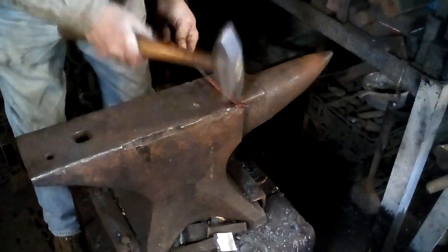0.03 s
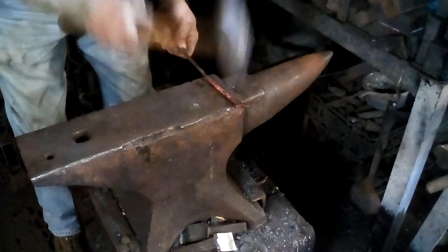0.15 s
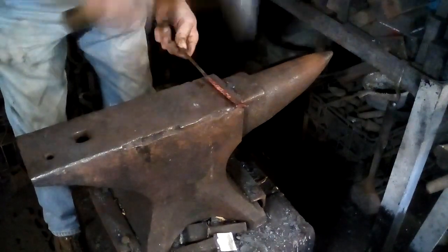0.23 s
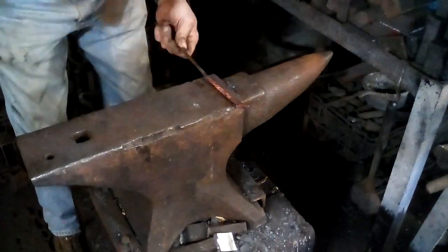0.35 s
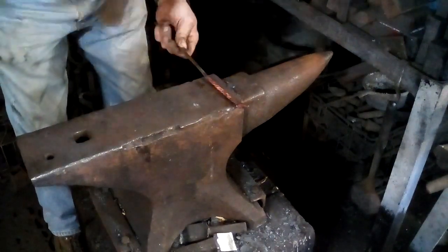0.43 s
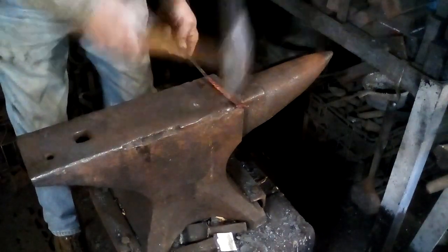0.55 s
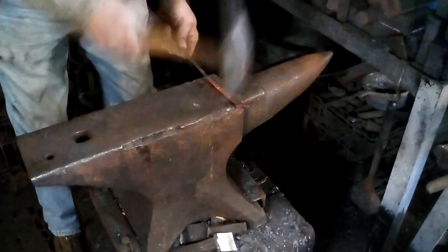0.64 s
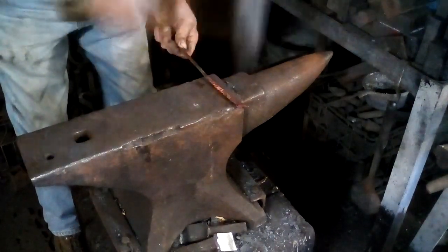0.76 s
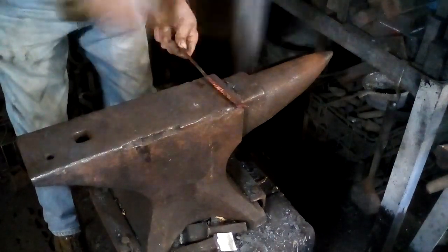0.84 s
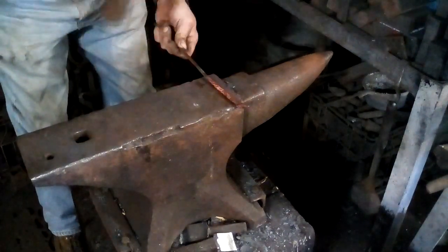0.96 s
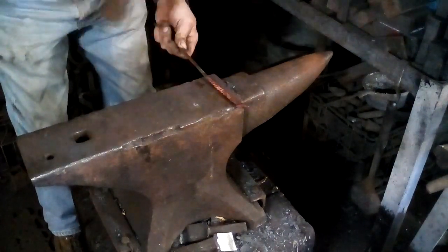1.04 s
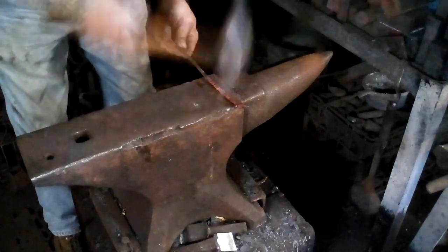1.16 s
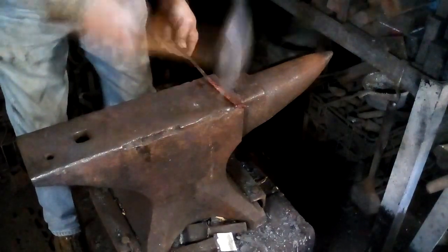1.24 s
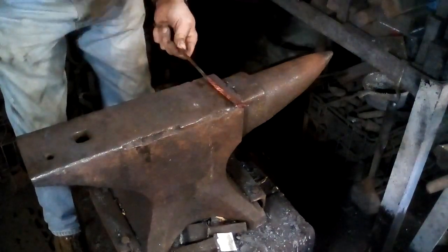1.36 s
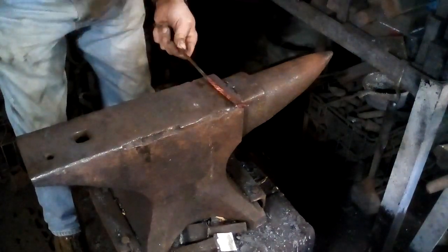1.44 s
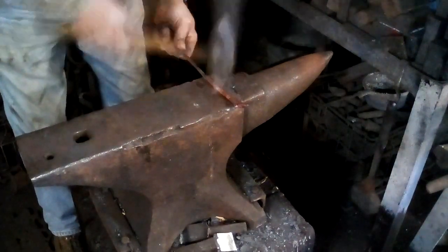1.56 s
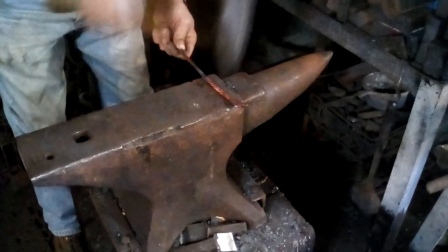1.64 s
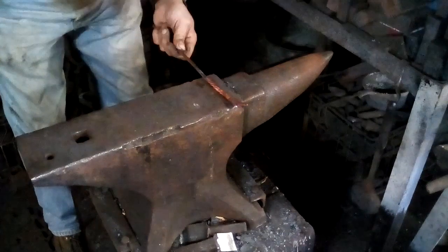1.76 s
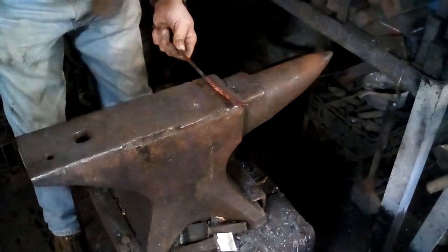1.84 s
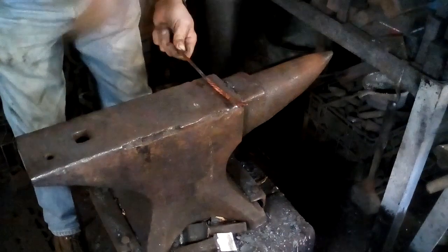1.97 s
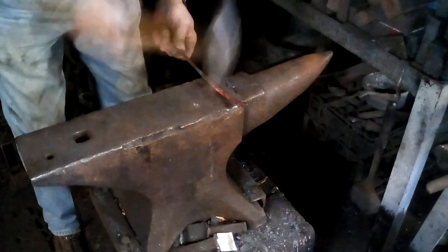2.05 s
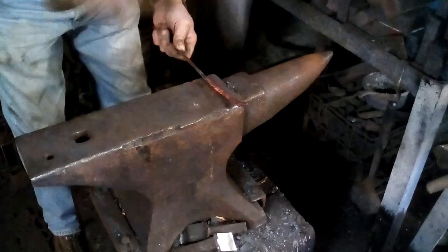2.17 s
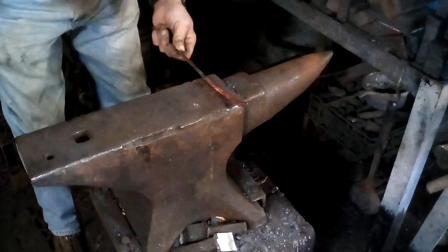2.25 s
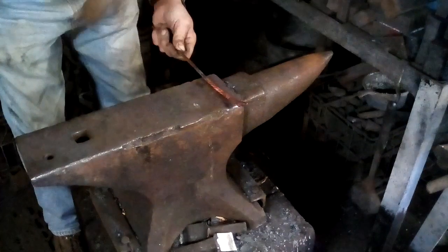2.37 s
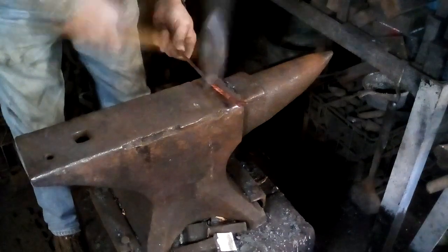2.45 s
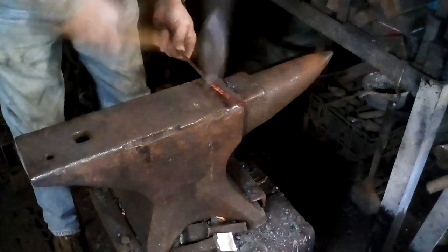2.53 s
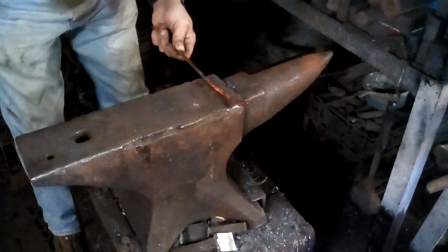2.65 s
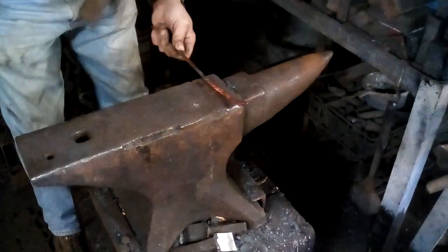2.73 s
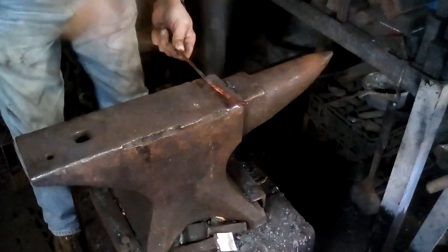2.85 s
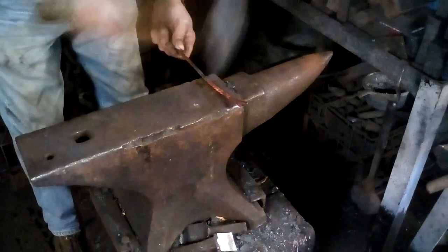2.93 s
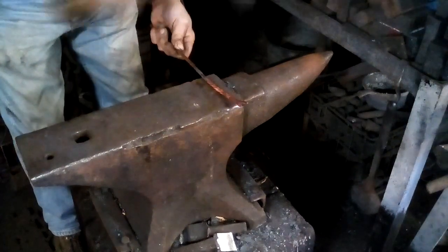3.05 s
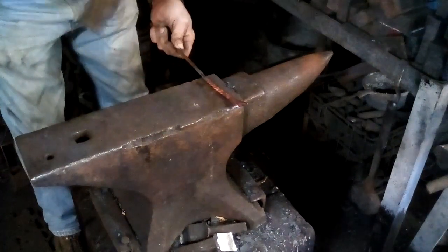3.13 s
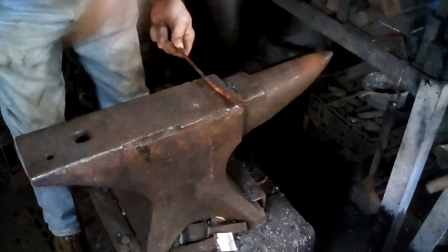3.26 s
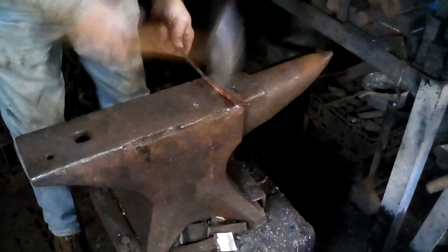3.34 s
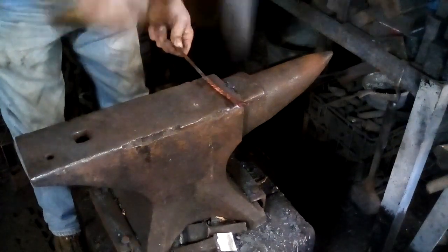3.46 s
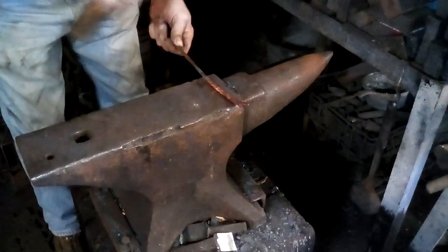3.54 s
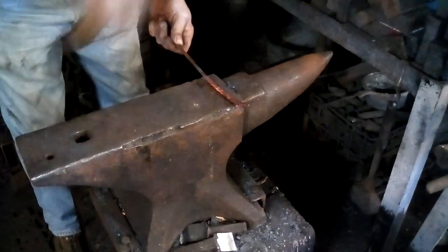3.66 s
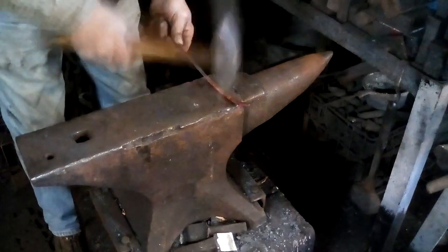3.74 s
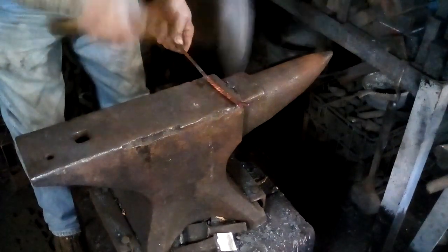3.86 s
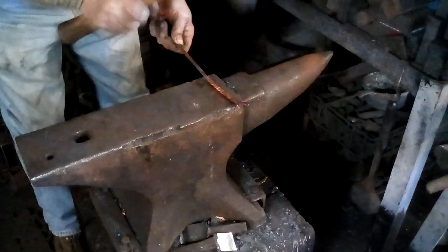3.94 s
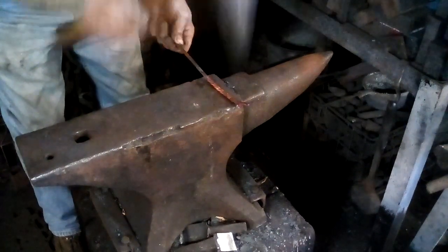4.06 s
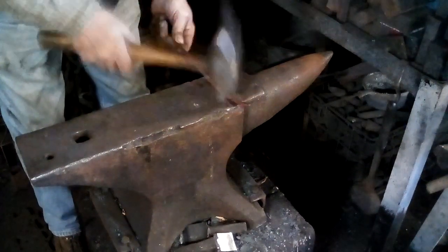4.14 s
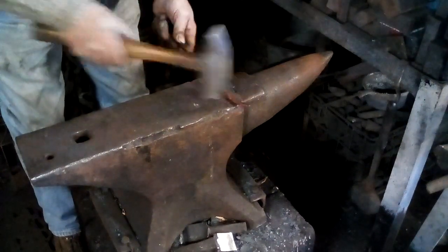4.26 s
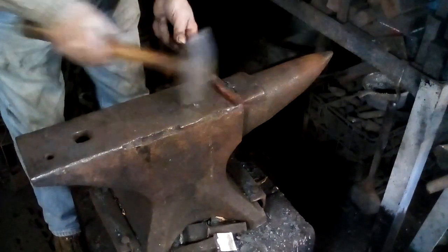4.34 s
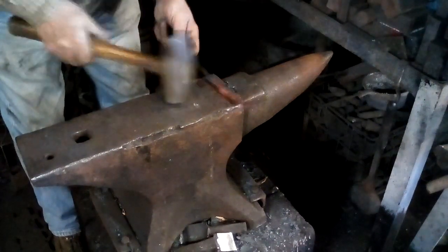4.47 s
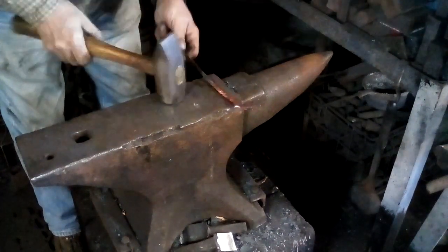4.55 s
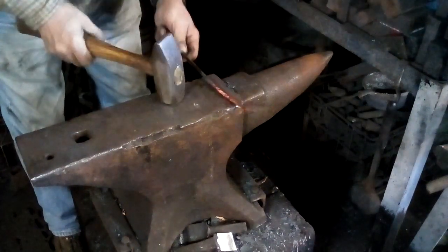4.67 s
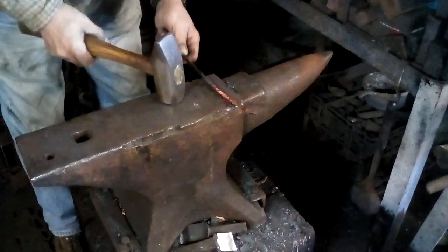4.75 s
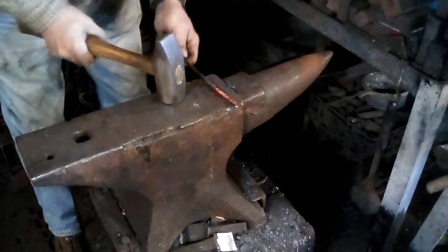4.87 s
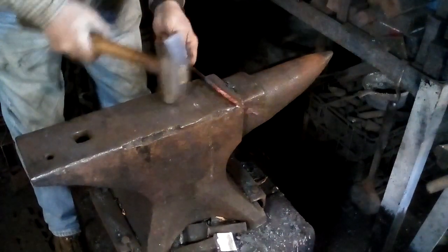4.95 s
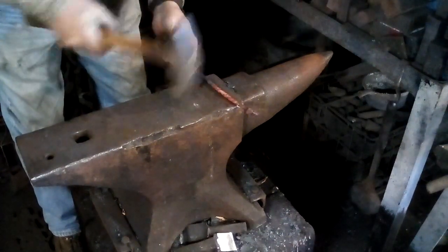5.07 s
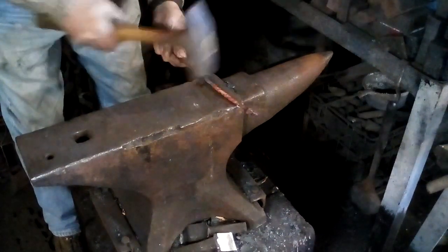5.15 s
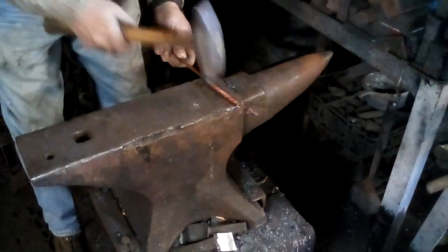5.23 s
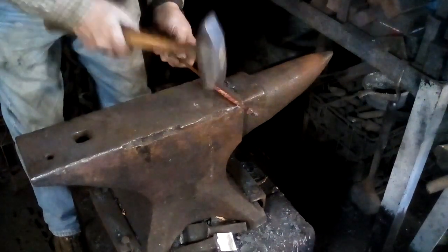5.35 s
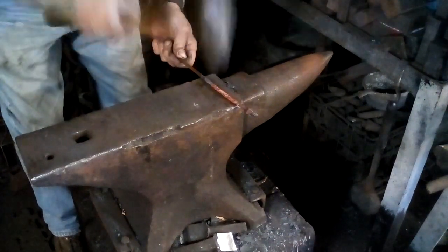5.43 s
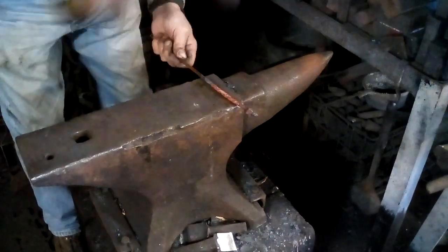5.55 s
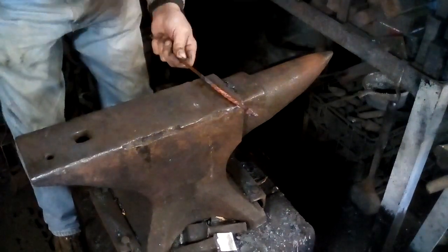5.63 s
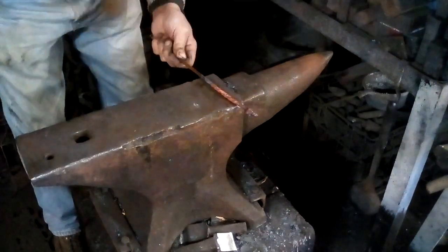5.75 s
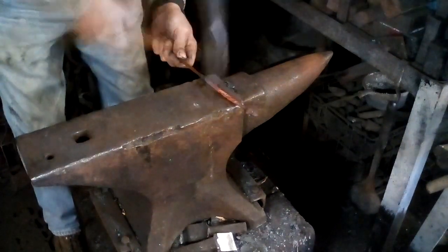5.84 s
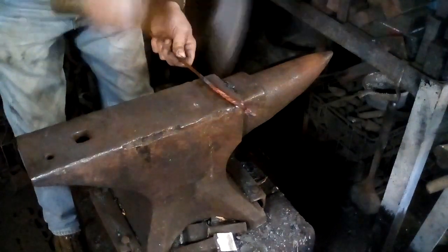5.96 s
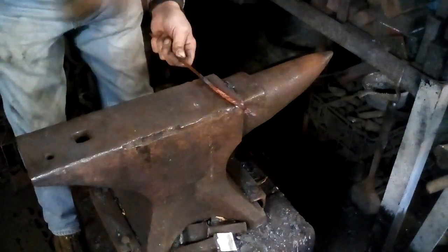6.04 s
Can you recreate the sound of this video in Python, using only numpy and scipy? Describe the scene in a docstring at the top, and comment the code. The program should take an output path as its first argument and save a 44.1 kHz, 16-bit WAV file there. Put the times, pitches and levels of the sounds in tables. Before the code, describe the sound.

Heavy hammer blows clang on hot steel over an anvil, break into small bouncing taps and a pause, then land once more.

```python
"""A smith draws out a hot steel bar on an anvil, over low shop rumble. One light blow, then nine heavy
ones (0.7-4.2 s): each a crack, ringing steel and a wash of workshop echo. The hammer bounces to rest
on the bare face in three taps (4.4-4.6 s). A faint blow follows, then a last heavy one (5.9 s).
Gain control ducks on each loud crack and lets the echo swell up behind it."""
import sys
import numpy as np
from scipy import signal
from scipy.fft import rfft, irfft, next_fast_len
from scipy.io import wavfile
from scipy.ndimage import uniform_filter1d, minimum_filter1d

SR = 44100
rng = np.random.default_rng(int(sys.argv[2]) if len(sys.argv) > 2 else 0)


def wrap_up_sound(samples):
    """Save the sound to the file named by the first command line argument, as 16-bit audio."""
    columns = np.atleast_2d(samples).T
    # keep every value between -1 and 1, then stretch to whole-number steps
    tamed = np.clip(columns, -1, 1)
    steps = np.round(tamed * 32767).astype(np.int16)
    wavfile.write(sys.argv[1], SR, steps)


N = 269010
TAIL = SR  # samples per struck sound
TAIL_S = np.arange(TAIL) / SR

# rumble and hiss: f/Hz, level/dB
FLOOR_EQ = [(30, -20.5), (60, 3), (150, 13.5), (400, 3), (900, -6), (2000, -11.5), (4000, -10.5),
            (6300, -14.5), (8300, -32), (14000, -29.5)]
# workshop echo: f/Hz, level/dB
ECHO_EQ = [(30, -3), (55, -16.5), (76, -11.5), (100, -5.5), (600, -1), (1250, -7), (2000, -2.5),
           (2400, -6.5), (2800, -16), (4050, -10.5), (4500, -17.5), (7400, -24.5), (8700, -40),
           (14000, -36.5)]
# echo decay: f/Hz, t60/s
ECHO_DECAY = [(80, 0.73), (210, 0.61), (560, 0.58), (1500, 0.54), (3900, 0.48), (7000, 0.34), (11000, 0.21),
              (15000, 0.13)]
# stand and low shop resonances: f/Hz, level/dB, t60/s
STAND_MODES = [(103, -6, .6), (116, -6, .6), (166, -2, .55), (177, -3, .55), (248, -6, .65), (266, -6, .55),
               (361, 0, .55), (473, -4, .55), (544, -4, .55), (562, -4, .55), (593, -1, .55),
               (636, -4, .55), (673, -6, .5), (794, -3, .55), (876, -3, .55), (909, -2, .55)]
# whole anvil jolting on its stand: f/Hz, level/dB, t60/s
THUMP_MODES = [(106, -19.5, 0.27), (125.3, -8, 0.22), (167.4, 1, 0.1), (197, -11, 0.059), (306, -7, 0.066),
               (378, -14, 0.14)]
# anvil, hammer and bar: f/Hz, level/dB, t60/s
STEEL_MODES = [(1254, -3, .55), (1492, -5, .5), (1603, -4, .5), (1707, -7, .5), (1855, 0, .52),
               (1981, -3, .45), (2240, -1, .45), (2270, -1, .42), (2345, -4, .4), (2425, -4, .4),
               (2713, -11, .4), (3575, -5, .5), (4005, -3, .5), (4064, -7, .38), (5830, -21, .35),
               (6255, -13, .33), (7294, -25, .3), (9930, -27, .28), (10990, -29, .24), (12390, -29, .2)]
# hammer head rebounding freely: f/Hz, level/dB, t60/s
HEAD_MODES = [(1020, -24, 0.031), (1900, -1.5, 0.069), (2270, 7, 0.038), (3970, 9, 0.018),
              (9900, -34, 0.17), (10900, -29.5, 0.055)]
# head and face damped against the bar: f/Hz, level/dB, t60/s
CLANK_MODES = [(1546, -0.5, 0.025), (1864, -9.5, 0.11), (2216, 3, 0.023), (3614, -16, 0.031),
               (4014, -8.5, 0.033), (6100, -18.5, 0.016)]
# cluster of close modes: f/Hz, level/dB
ZING_EQ = [(5600, -50), (6100, -14), (6250, 0), (6420, -12), (7000, -50)]
# brittle scale breaking: f/Hz, level/dB
SNAP_EQ = [(3000, -29.5), (5500, 7), (7500, -9.5), (9000, -10.5), (12000, -9.5), (15000, -11)]
# contact crack: f/Hz, level/dB
CRACK_EQ = [(35, -13), (60, -46.5), (170, 2), (420, -1.5), (600, -7.5), (1000, -0.5), (1500, -4.5),
            (2250, 1.5), (2700, -9), (3900, -4.5), (4800, -16), (7000, -16), (8500, -39), (14000, -47)]
# steel-on-steel tap, bright clink near 3 kHz over a low knock: f/Hz, gain/dB
TAP_EQ = [(120, 5), (250, 2), (650, 0), (1100, 3), (2200, 2), (3000, 11), (4000, 1), (5800, 6), (8000, -12),
          (11000, -9.5), (15000, -40)]
# full blow: f/Hz, gain/dB
BLOW_EQ = [(160, -2.5), (600, -4), (1900, -7.5), (3800, -6), (7000, -5), (11000, 0.5)]
# clang grows fastest with force: f/Hz, slope/(dB per dB of force)
FORCE_SLOPE = [(160, 0.96), (600, 0.99), (1900, 1.04), (3200, 0.97), (7000, .5), (11000, 0.5)]
# harder, shorter contact lifts the treble: f/Hz, slope/(dB per dB of hardness)
HARDNESS_SLOPE = [(700, 0), (2000, 0.98), (3300, 1.34), (6000, 0.97), (11000, 0.88)]
# bounces on the bare face: t/s, level/dB, treble/dB, whole-anvil level/dB
FACE_TAPS = [(4.4468, -18, -1.5, -19), (4.5223, -13.5, 0, -17), (4.5650, -22, -28, -9)]
# blows on the hot bar: t/s, force/dB, hardness/dB, main-note level/dB
BAR_BLOWS = [(0.0184, -19, -6, -46), (0.6955, -0.5, -2, -18.5), (1.1709, 0.45, 0.5, -21),
             (1.6193, 0.8, 0, -18), (2.0714, 1.4, 0, -11), (2.513, 0.76, 0.5, -8), (2.9551, 0.4, 6.5, -3.5),
             (3.3823, -0.45, 3.5, -23), (3.8039, -1.5, 4, -18.5), (4.1957, -4, -5, -23),
             (5.3848, -33.5, 4, -36), (5.936, 0.5, -0.5, -15.5)]
# microphone port resonance: f/Hz, gain/dB
MIC_PORT_EQ = [(13700, 0), (14400, 7), (14950, 12), (15500, 7), (16200, -4)]


def undb(db):
    """Decibels to gain."""
    return 10 ** (np.asarray(db) / 20)


def curve(points, hz):
    """Interpolate (f/Hz, value) points over log frequency."""
    knots_hz, values = np.transpose(points)
    return np.interp(np.log(np.maximum(hz, 1)), np.log(knots_hz), values)


def colour(x, eq):
    """Minimum-phase filter from (f/Hz, gain/dB) points."""
    size = 2 * next_fast_len(len(x))
    gain = undb(curve(eq, np.fft.rfftfreq(size, 1 / SR)))
    cepstrum = irfft(np.log(gain))
    cepstrum[1:size // 2] *= 2
    cepstrum[size // 2 + 1:] = 0
    return irfft(rfft(x, size) * np.exp(rfft(cepstrum)))[:len(x)]


def add(track, at_s, sound):
    """Mix a sound in at at_s."""
    start = max(int(at_s * SR), 0)
    track[start:start + len(sound)] += sound[:N - start]


def decay(t60_s, start_db=0):
    """Exponential fade, 60 dB per t60_s."""
    return undb(start_db - 60 * TAIL_S / t60_s)


def ring(modes, rise_s=0.0002):
    """Struck modes, random phase: rise during contact, then decay."""
    rise = 1 - np.exp(-(TAIL_S / rise_s) ** 2)
    return rise * sum(decay(t60_s, db) * np.sin(2 * np.pi * (hz * TAIL_S + rng.random()))
                      for hz, db, t60_s in modes)


def even_noise(fade, width_bins):
    """Noise whose smoothed spectrum is flat once multiplied by fade."""
    noise = rng.standard_normal(TAIL)
    for _ in range(2):
        power = uniform_filter1d(np.abs(rfft(noise * fade, 2 * TAIL)) ** 2, size=width_bins)
        noise = irfft(rfft(noise, 2 * TAIL) * np.sqrt(power.mean() / power))[:TAIL]
    return noise * np.sqrt(np.sum(fade ** 2) / np.sum((noise * fade) ** 2))


def background(level_db=-57, knots=90):
    """Shop rumble under thin hiss, wavering by about 1 dB."""
    noise = colour(rng.standard_normal(N), FLOOR_EQ)
    waver_db = np.interp(np.linspace(0, knots - 1, N), np.arange(knots), rng.standard_normal(knots))
    return noise / np.std(noise) * undb(level_db + waver_db)


def shop_echo(build_s=0.0059):
    """Dense reflections: fast build-up, treble dies first."""
    bands_hz, t60s_s = np.transpose(ECHO_DECAY)
    fades = (1 - np.exp(-TAIL_S / build_s)) * decay(t60s_s[:, None])
    spectrum = rfft(even_noise(fades[0], width_bins=60))
    hz = np.fft.rfftfreq(TAIL, 1 / SR)
    echo = 0
    for weights, fade in zip(np.eye(len(bands_hz)), fades):
        band = irfft(spectrum * curve(np.c_[bands_hz, weights], hz), TAIL)
        echo = echo + fade * band
    return colour(echo, ECHO_EQ)


def stand_thump(gain_db=-10, wall_db=-12, wall_s=0.09, rise_s=0.003, low_cut_hz=100):
    """Anvil jolts its stand, radiating no deep bass; the far wall reflects it."""
    modes = sum(decay(t60_s, db) * np.sin(2 * np.pi * hz * TAIL_S) for hz, db, t60_s in THUMP_MODES)
    rise = 1 - np.exp(-TAIL_S / rise_s)
    thump = signal.sosfilt(signal.butter(4, low_cut_hz, "high", fs=SR, output="sos"), modes * rise)
    reflection = np.interp(TAIL_S - wall_s, TAIL_S, thump, left=0)
    return undb(gain_db) * (thump + undb(wall_db) * reflection)


def anvil_note(hz=4600.3, t60_s=0.42, swell_s=0.1):
    """Main anvil mode: its decay times a swell as the room fills."""
    swell = 0.7 + 1.65 * (1 - np.exp(-TAIL_S / swell_s))
    return ring([(hz, 0, t60_s)]) * swell


def zing(t60_s=0.38):
    """Unresolved modes ringing as a rough narrow band."""
    return colour(rng.standard_normal(TAIL), ZING_EQ) * decay(t60_s)


def scale_snap(t60_s=0.016):
    """Scale shattering at impact."""
    return colour(rng.standard_normal(TAIL), SNAP_EQ) * decay(t60_s)


def crack(t60_s=0.02, scatter_db=-17, scatter_t60_s=0.15, rise_s=0.0002):
    """Contact: brief dense vibration, then scatter off the floor and nearby things."""
    fade = decay(t60_s) + decay(scatter_t60_s, scatter_db)
    rise = 1 - np.exp(-TAIL_S / rise_s)
    return colour(even_noise(fade, width_bins=400) * fade * rise, CRACK_EQ)


def bouncing(note, thump, crack_db=15, echo_db=1.5, steel_db=-28, note_db=-27):
    """Hammer drops on the bare face and rebounds at shrinking intervals."""
    contact = undb(crack_db) * colour(crack(t60_s=0.019, scatter_db=-15.5), TAP_EQ) + ring(HEAD_MODES)
    wash = colour(undb(echo_db) * shop_echo() + undb(steel_db) * ring(STEEL_MODES), TAP_EQ)
    anvil = thump + undb(note_db) * note
    track = np.zeros(N)
    for at_s, level_db, treble_db, anvil_db in FACE_TAPS:
        tap = colour(contact + wash, [(4000, level_db), (9000, level_db + treble_db)])
        add(track, at_s, tap + undb(anvil_db) * anvil)
    return track


def blow_eq(force_db, hardness_db):
    """One blow's (f/Hz, gain/dB) shape from force and contact hardness."""
    hz = np.geomspace(100, 16000, 45)
    gain_db = curve(BLOW_EQ, hz) + force_db * curve(FORCE_SLOPE, hz)
    return np.c_[hz, gain_db + hardness_db * curve(HARDNESS_SLOPE, hz)]


def forging(note, thump, crack_db=19, snap_db=-3, echo_db=6.5, steel_db=-19, zing_db=-3.5,
            stand_db=-19, clank_db=5, head_db=-6, thump_db=-5, thump_db_per_db=0.14):
    """Blows near one spot share most of their sound; force and the hot bar's give set the colour."""
    steel = undb(steel_db) * ring(STEEL_MODES) + undb(zing_db) * zing()
    contact = undb(crack_db) * crack() + undb(snap_db) * scale_snap()
    room = undb(echo_db) * shop_echo() + undb(stand_db) * ring(STAND_MODES)
    # the bar lies differently each blow, varying crack and echo
    along, across = (undb(crack_db) * crack() + undb(echo_db) * shop_echo() for _ in range(2))
    track = np.zeros(N)
    for at_s, force_db, hardness_db, note_db in BAR_BLOWS:
        angle_rad = 2 * np.pi * rng.random()
        shift = 0.4 * (np.cos(angle_rad) * along + np.sin(angle_rad) * across)
        hammer = undb(clank_db) * ring(CLANK_MODES) + undb(head_db) * ring(HEAD_MODES)
        blow = colour(contact + steel + room + hammer + shift, blow_eq(force_db, hardness_db))
        jolt = undb(thump_db + thump_db_per_db * force_db) * thump  # even light blows jolt the stand
        add(track, at_s, blow + undb(note_db) * note + jolt)
    return track


def scene():
    """Hammer work and background, mono."""
    note, thump = anvil_note(), stand_thump()
    return (forging(note, thump) + bouncing(note, thump) + background())[None]


def gain_control(x, threshold_db=-19.5, ratio=3.4, release_s=0.048, ahead_s=0.0054):
    """Look-ahead compressor: fast duck, steady recovery."""
    power = uniform_filter1d(x ** 2, size=220)
    log_rms = np.log(np.maximum(power, 1e-12)) / 2
    log_release = np.arange(N) / SR / release_s
    held_rms = np.exp(np.maximum.accumulate(log_rms + log_release) - log_release)
    gain = np.minimum(undb(threshold_db) / held_rms, 1) ** (1 - 1 / ratio)
    half_window = int(ahead_s * SR / 2)
    gain = minimum_filter1d(gain, 2 * half_window + 1, origin=-half_window)
    return x * uniform_filter1d(gain, size=130)


def record(dry, low_cut_hz=65.5, ceiling=0.75, top_cut_hz=15900):
    """Microphone port, gain control, bass cut, soft clip, steep top cut."""
    sound = gain_control(colour(dry[0], MIC_PORT_EQ))
    sound = signal.sosfilt(signal.butter(2, low_cut_hz, "high", fs=SR, output="sos"), sound)
    sound = sound / (1 + (sound / ceiling) ** 6) ** (1 / 6)
    return signal.sosfilt(signal.ellip(8, 0.2, 70, top_cut_hz, fs=SR, output="sos"), sound)[None]


dry = scene()
out = record(dry)
wrap_up_sound(out)
```